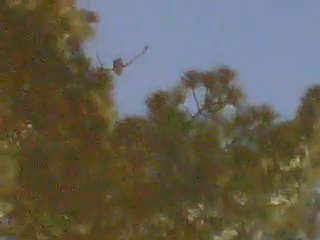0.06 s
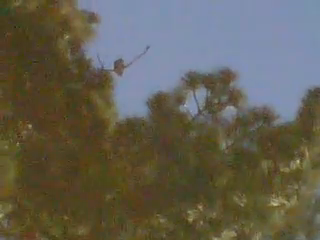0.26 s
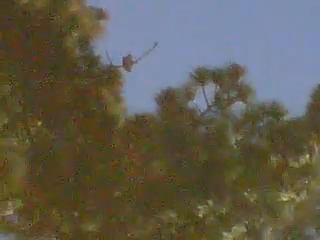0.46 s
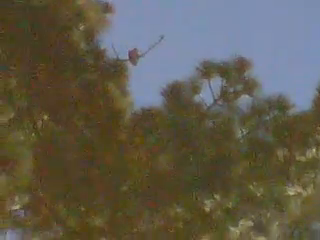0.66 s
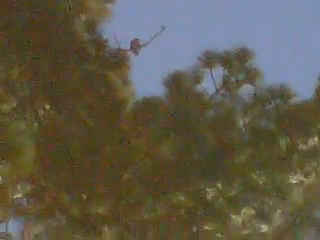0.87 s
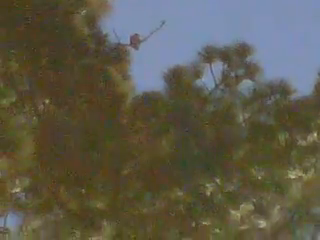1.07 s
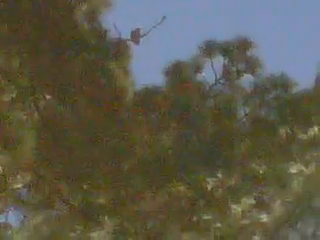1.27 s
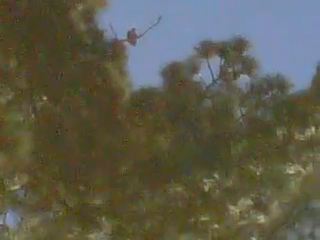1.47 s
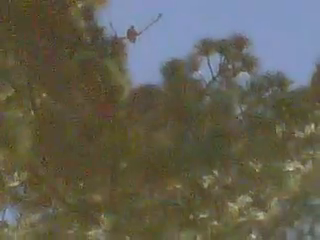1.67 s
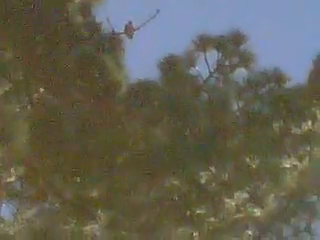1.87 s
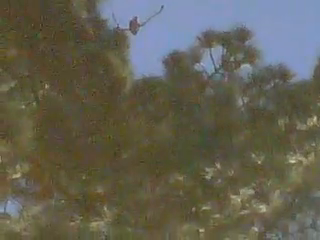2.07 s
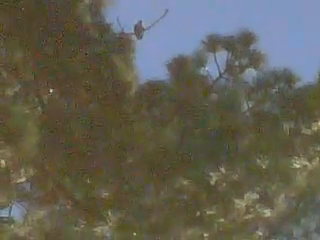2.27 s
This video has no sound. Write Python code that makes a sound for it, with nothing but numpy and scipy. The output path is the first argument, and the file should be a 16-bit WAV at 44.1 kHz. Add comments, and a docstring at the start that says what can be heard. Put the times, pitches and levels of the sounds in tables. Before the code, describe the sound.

A hawk screams once among trees, starting at about 0.2 seconds. The high cry leaps up, cracks into a breathy rasp around 0.4 seconds, then holds a hoarse, fluttering note that slowly sinks and fades by 1.9 seconds, with a faint short echo. Leaves hiss softly throughout, and light wind bumps the microphone near 0.9 seconds and a few times afterwards.

```python
"""Hawk scream among trees

A hawk screams once: the voice leaps up, cracks into a rasp, then holds a long, slowly sinking
hoarse note. Its second harmonic carries the cry, with air rushing through the open beak.
Ground and trunks send back short echoes; leaves hiss and light wind touches the microphone."""
import sys
import numpy as np
from scipy import signal
from scipy.fft import rfft, irfft
from scipy.io import wavfile
from scipy.ndimage import uniform_filter1d

SR = 44100
rng = np.random.default_rng(int(sys.argv[2]) if len(sys.argv) > 2 else 0)


def put_to_file(sound):
    """Save the sound as 16-bit audio at rate SR, in the file named by the first command-line argument."""
    columns = np.atleast_2d(sound).T  # one column per channel
    safe = np.clip(columns, -1, 1)
    whole_steps = np.round(safe * 32767)
    wavfile.write(sys.argv[1], SR, whole_steps.astype(np.int16))


N = 105840
T = np.arange(N) / SR


# the fundamental's leap and long fall: time_s, pitch_hz
PITCH = [(.215, 1248), (.24, 1452), (.258, 1684), (.283, 1695), (.30, 1644), (.335, 1625), (.355, 1725),
         (.38, 1695), (.418, 1389), (.53, 1298), (.60, 1257), (.69, 1226), (.88, 1208), (1.08, 1200),
         (1.2, 1161), (1.35, 1153), (1.46, 1148), (1.57, 1131), (1.76, 1140), (1.83, 1050)]
# grit in the voice: time_s, roughness (0-1)
HOARSENESS = [(.22, 1.0), (.255, .9), (.28, .25), (.335, .25), (.38, .7), (.42, .2), (.6, .25), (.72, .6),
              (1.1, .6), (1.3, .45), (1.45, .9), (1.85, 1.0)]
# dips where the voice catches: centre_s, half_width_s, gain_db
CATCHES = [(0.633, 0.011, -4), (.763, 0.015, -8), (0.828, 0.0018, -16.5), (1.239, 0.013, -12),
           (1.383, 0.0014, -12.5), (1.4, 0.0046, -6), (1.53, 0.011, -9)]

def hawk():
    """One scream: a jittering voice that flutters and catches, over its fundamental and breath."""
    pitch, hoarse = in_time(PITCH), in_time(HOARSENESS)
    jitter = .04 * hoarse * drift(rate_hz=110)
    waver = .00304 * drift(rate_hz=29.93)
    bend = 1 + jitter + waver
    phase = turning(pitch * bend)
    shimmer = np.sqrt(2) * unit_rms(from_db(drift(rate_hz=130)))
    voice = shimmer * (ringing_note(phase) + cracks(bend)) + rasp(pitch)
    flutter = unit_rms(from_db(3.5 * np.tanh(drift(rate_hz=120))))
    catches = from_db(sum(db * swell(s, width) for s, width, db in CATCHES))
    return flutter * catches * voice + fundamental(phase, hoarse) + breath()


# the ringing note's envelope: time_s, level_db
NOTE_LEVEL = [(.2, -75.5), (.243, -51), (.268, -54.5), (.284, -41.5), (.325, -41.5), (.345, -51),
              (.37, -57), (.42, -68.5), (.54, -49.5), (.575, -44), (.61, -39), (.64, -44.5), (.69, -43.5),
              (.81, -41), (1.0, -46), (1.06, -40), (1.15, -47.5), (1.23, -42.5), (1.27, -41.5), (1.34, -42),
              (1.4, -48.5), (1.46, -45), (1.51, -52), (1.555, -45.5), (1.6, -50), (1.77, -62.5),
              (1.82, -54.5), (1.89, -93)]
# faint sheen, relative to the note: harmonic_number, level_db
OVERTONES = [(3, -34), (4, -44)]

def ringing_note(phase):
    """The second harmonic rings out, with two weak overtones above it."""
    overtones = sum(from_db(db) * np.sin(k * phase) for k, db in OVERTONES)
    return envelope(NOTE_LEVEL) * (np.sin(2 * phase) + overtones)


# squeaks at the start of the cry: centre_s, half_width_s, pitch_hz, level_db
CRACKS = [(.29, 0.012, 2520, -54.5), (0.32, 0.0041, 2650, -41.5), (0.349, 0.016, 2510, -45),
          (.36, 0.019, 3020, -48.5), (.405, 0.012, 2860, -65)]

def cracks(bend):
    """Brief side tones break out as the voice cracks, wobbling with its pitch."""
    return sum(from_db(db) * swell(s, width) * np.sin(turning(hz * bend)) for s, width, hz, db in CRACKS)


# the rasp's envelope: time_s, level_db
RASP_LEVEL = [(.2, -82), (.24, -60), (.3, -56), (.345, -49.5), (.4, -45), (.44, -49), (.52, -48.5),
              (.62, -48.5), (1.0, -50.5), (1.47, -51.5), (1.56, -51.5), (1.6, -55.5), (1.71, -52.5),
              (1.78, -63.5), (1.83, -60), (1.92, -71.5)]
# passband of throat and open beak: frequency_hz, gain_db
THROAT = [(900, -23), (1300, -1), (1650, -2.5), (1970, -19), (2070, 1), (2550, 2.5), (2740, -8), (2930, -3),
          (3200, -16), (3450, -7.5), (3700, -22.5), (4100, -20.5)]

def rasp(pitch, spread_hz=420, below_hz=70):
    """The voice breaks up into a noise band just under the second harmonic, shaped by the throat."""
    centre = turning(2 * pitch - below_hz)
    band = drift(spread_hz) * np.cos(centre) + drift(spread_hz) * np.sin(centre)
    band = coloured(band, THROAT)
    running_rms = np.sqrt(uniform_filter1d(band ** 2, size=1100) + 1e-12)
    return envelope(RASP_LEVEL) * band / running_rms


# the fundamental's envelope: time_s, level_db
FUNDAMENTAL_LEVEL = [(.2, -84), (.235, -62), (.26, -89), (.32, -78.5), (.36, -52.5), (.408, -59),
                     (.42, -46.5), (.452, -59), (.468, -69), (.495, -53), (.51, -66), (.52, -54.5),
                     (.545, -53.5), (.565, -71.5), (.65, -66), (.68, -59), (.78, -66), (.98, -65.5),
                     (1.05, -62.5), (1.13, -69.5), (1.42, -65.5), (1.6, -68.5), (1.88, -72.5)]

def fundamental(phase, hoarse, scatter_rad=1.7, surge_db=4):
    """The lowest partial sounds out as the voice cracks; hoarseness blurs it and makes it surge."""
    scatter = hoarse * scatter_rad * drift(rate_hz=90)
    surges = from_db(hoarse * surge_db * drift(rate_hz=30))
    return surges * envelope(FUNDAMENTAL_LEVEL) * np.sqrt(2) * np.sin(phase + scatter)


# the breath's envelope: time_s, level_db
BREATH_LEVEL = [(.2, -72), (.25, -62.5), (.31, -63), (.36, -56), (.5, -58), (.61, -61), (.66, -68.5),
                (1.0, -72.5), (1.4, -69), (1.51, -65), (1.56, -70), (1.62, -67), (1.8, -75), (1.9, -78)]
# the breath's colour: frequency_hz, gain_db
BREATH_COLOUR = [(600, -17.5), (1200, -14), (1600, 5), (2500, -7), (3500, 4.5), (3950, -3.5), (4250, -2),
                 (5300, -2.5), (7200, -12)]

def breath():
    """Air rushes through the beak, strongest early in the cry."""
    return envelope(BREATH_LEVEL) * unit_rms(coloured(rng.standard_normal(N), BREATH_COLOUR))


# bounces off the ground and nearby trunks: delay_s, gain_db
ECHOES = [(.01177, -10), (.01144, -17)]
# narrow bands that close reflections reinforce: centre_hz, gain_db
RIDGES = [(1239, 0.5), (1309, -11.5), (1377, -4.5), (1660, -13.5), (2066, 1.5), (2180, -1.5), (2325, 0),
          (2431, -5), (2540, -9.5), (2840, 3.5), (3064, -5), (3150, 5), (3245, -2.5), (3420, 4.5)]

def among_trees(cry, ridge_width_hz=24, tail_t60_s=.25, tail_db=-11):
    """Direct sound, close reflections with their comb-like colour, and a faint scattered tail."""
    echoes = sum(from_db(db) * np.interp(T - s, T, cry, left=0) for s, db in ECHOES)
    ridges = sum(from_db(db) * signal.lfilter(*signal.iirpeak(hz, hz / ridge_width_hz, fs=SR), cry)
                 for hz, db in RIDGES)
    tail = rng.standard_normal(N) * from_db(-60 * T / tail_t60_s) * (T > ECHOES[0][0])
    scattered = signal.fftconvolve(cry, tail / np.linalg.norm(tail))[:N]
    return cry + echoes + ridges + from_db(tail_db) * scattered


# colour of leaves and distant air: frequency_hz, gain_db
LEAF_COLOUR = [(20, -2.5), (60, -2), (120, -3.5), (250, -5), (500, -6.5), (1000, -9.5), (1600, -12.5),
               (3000, -16), (3800, -16.5), (4000, -16.5), (4200, -18), (6300, -18.5), (7200, -23.5)]

def leaves(level_db=-64):
    """Leaves and distant air lay down a steady bed of hiss."""
    return from_db(level_db) * unit_rms(coloured(rng.standard_normal(N), LEAF_COLOUR))


# soft bumps of wind: centre_s, half_width_s, pitch_hz, level_db
PUFFS = [(0.889, 0.012, 156, -59), (1.19, 0.014, 77, -63.5), (1.302, 0.074, 60, -68.5),
         (1.879, 0.012, 111.5, -62.5), (2.104, .025, 67, -64)]

def wind(level_db=-78.5, swing_db=1.5):
    """Light wind on the microphone: a lumpy low rumble and a few puffs."""
    breeze = from_db(level_db - swing_db * drift(rate_hz=6)) * rumble(hz=71)
    puffs = sum(from_db(db) * swell(s, width) * rumble(hz) for s, width, hz, db in PUFFS)
    return breeze + puffs


def rumble(hz):
    """A band of noise around this frequency."""
    band = signal.butter(2, [hz / 2, hz * np.sqrt(2)], "band", fs=SR, output="sos")
    return unit_rms(signal.sosfilt(band, rng.standard_normal(N)))


def from_db(db):
    """Decibels to gain."""
    return 10 ** (np.asarray(db) / 20)


def unit_rms(x):
    """Scale to unit rms."""
    return x / np.sqrt(np.mean(x ** 2) + 1e-20)


def in_time(rows):
    """Join time_s, value rows by straight lines."""
    return np.interp(T, *np.transpose(rows))


def envelope(rows):
    """Gain from time_s, level_db rows, dying away outside them."""
    outside_s = np.maximum(rows[0][0] - T, 0) + np.maximum(T - rows[-1][0], 0)
    return from_db(in_time(rows)) * np.exp(-20 * outside_s)


def swell(centre_s, half_width_s):
    """A bell-shaped fade in and out."""
    return np.exp(-((T - centre_s) / half_width_s) ** 2)


def coloured(x, curve):
    """Equalise by frequency_hz, gain_db rows."""
    hz, db = np.transpose(curve)
    bins = np.maximum(np.fft.rfftfreq(N, 1 / SR), 1)
    return irfft(rfft(x) * from_db(np.interp(np.log(bins), np.log(hz), db)), N)


def drift(rate_hz):
    """Smooth random motion with unit rms."""
    pole = np.exp(-2 * np.pi * rate_hz / SR)
    return unit_rms(signal.lfilter([1], [1, -2 * pole, pole * pole], rng.standard_normal(N + SR))[SR:])


def turning(hz):
    """Phase of an oscillator with this frequency."""
    return 2 * np.pi * np.cumsum(hz) / SR


def scene(cry_gain_db=-3.5):
    """The cry, all its layers trimmed together, over leaves and wind in mono."""
    return (from_db(cry_gain_db) * among_trees(hawk()) + leaves() + wind())[None]


def record(dry, notch_hz=3993, cutoff_hz=7250):
    """A narrow-band recorder with a slim notch in the treble cuts the top steeply."""
    notched = signal.lfilter(*signal.iirnotch(notch_hz, Q=47, fs=SR), dry)
    return signal.sosfilt(signal.ellip(12, .2, 70, cutoff_hz, fs=SR, output="sos"), notched)


dry = scene()
out = record(dry)
put_to_file(out)
```